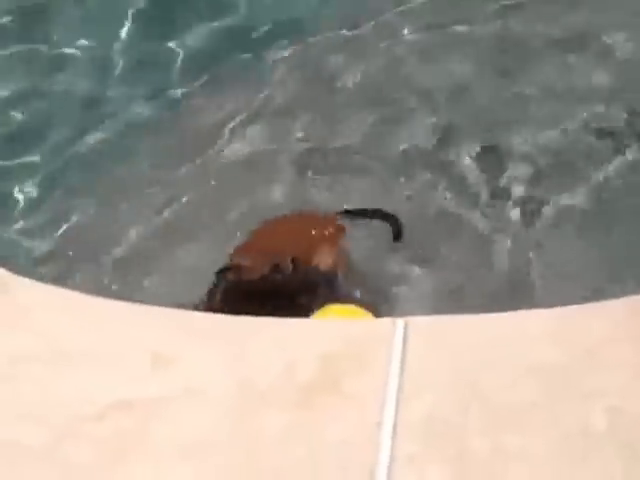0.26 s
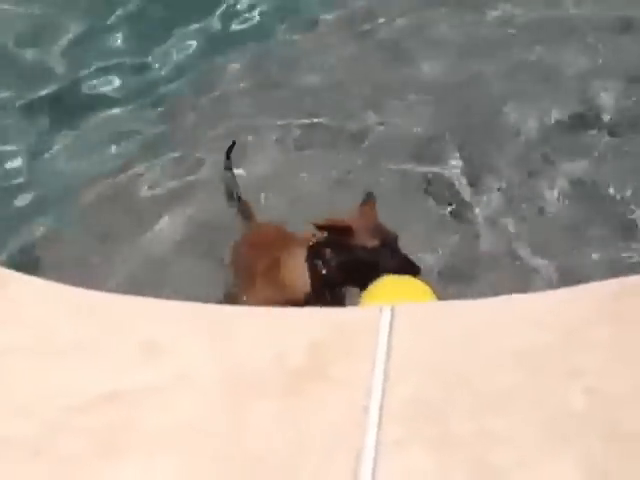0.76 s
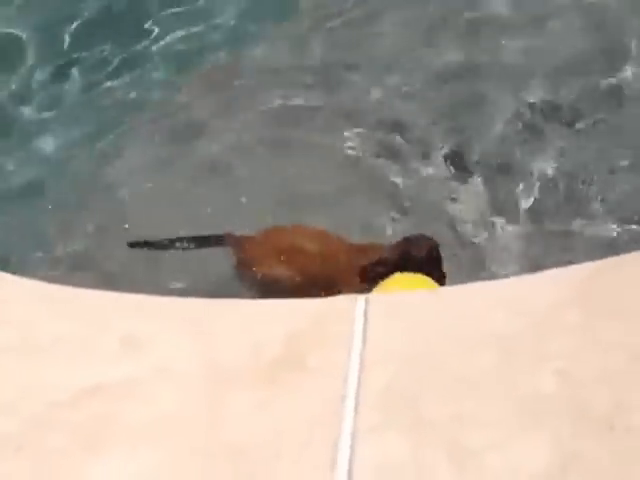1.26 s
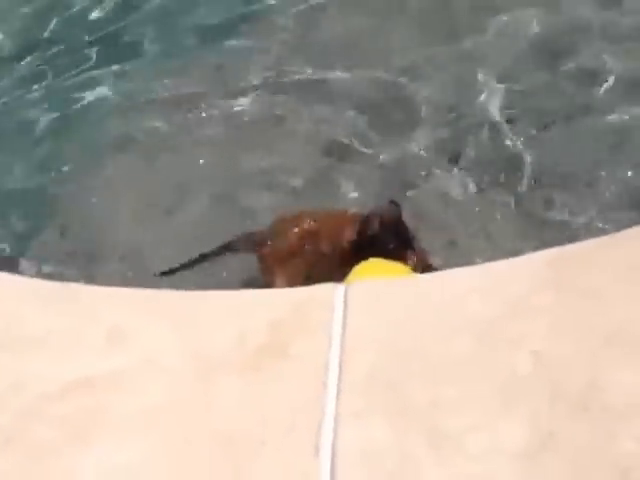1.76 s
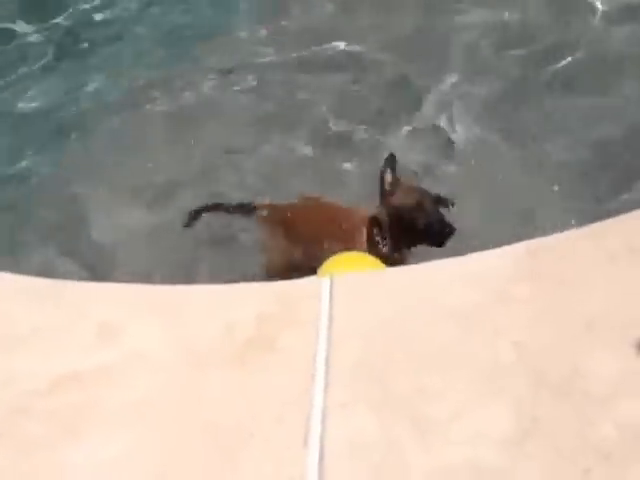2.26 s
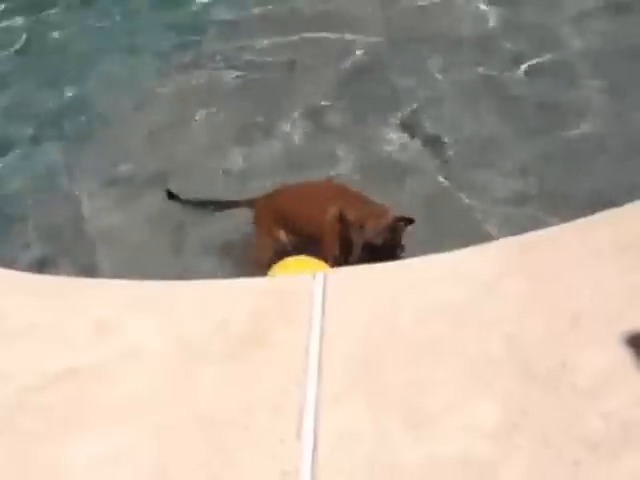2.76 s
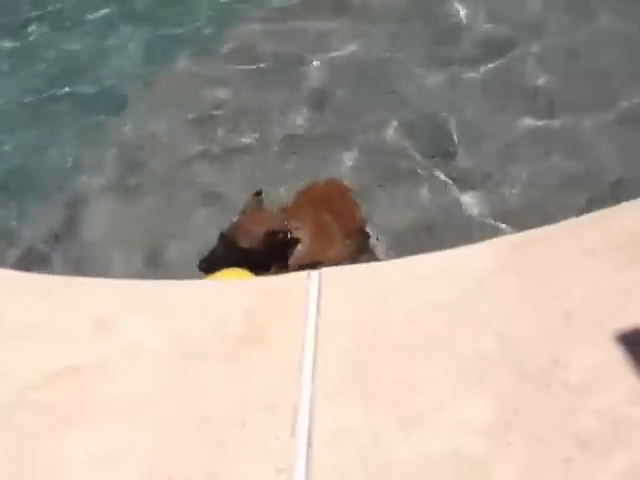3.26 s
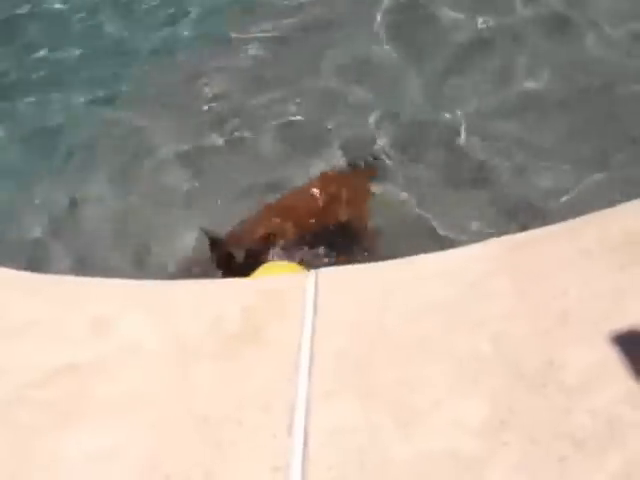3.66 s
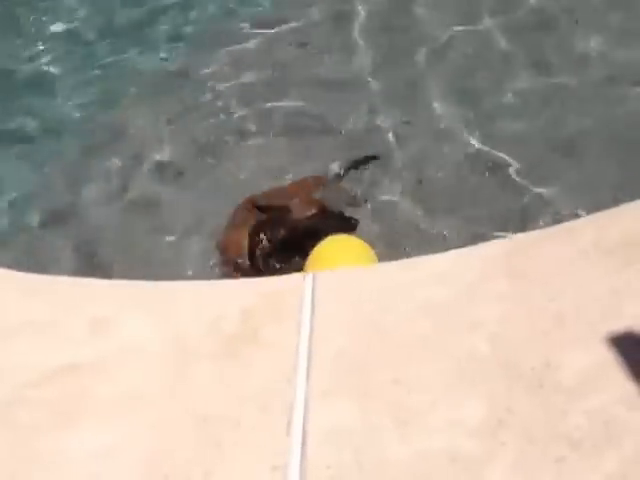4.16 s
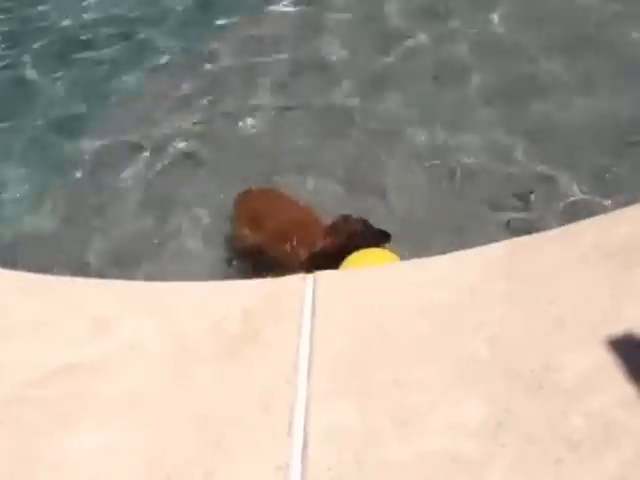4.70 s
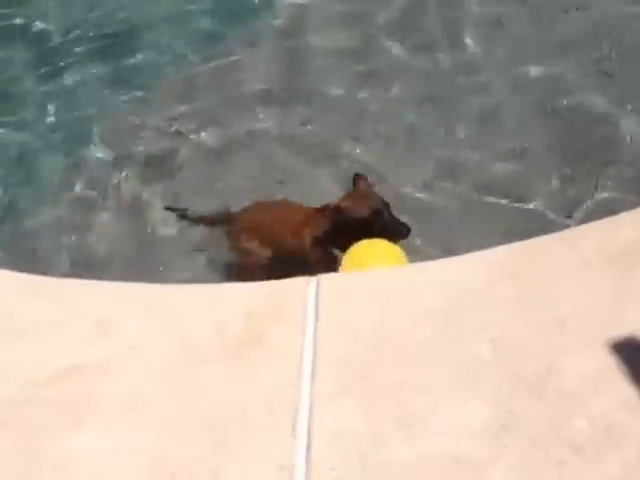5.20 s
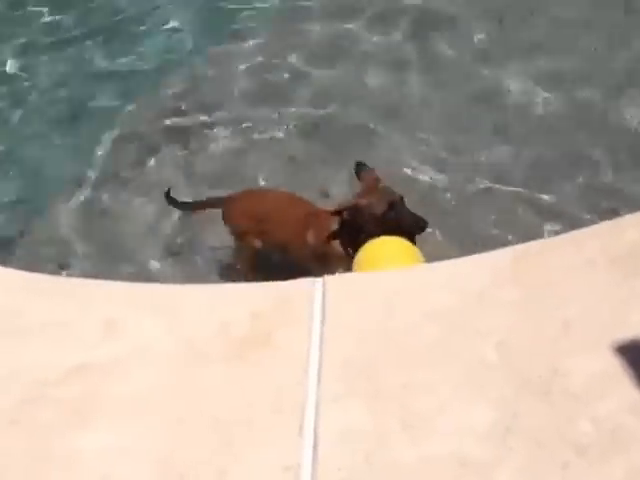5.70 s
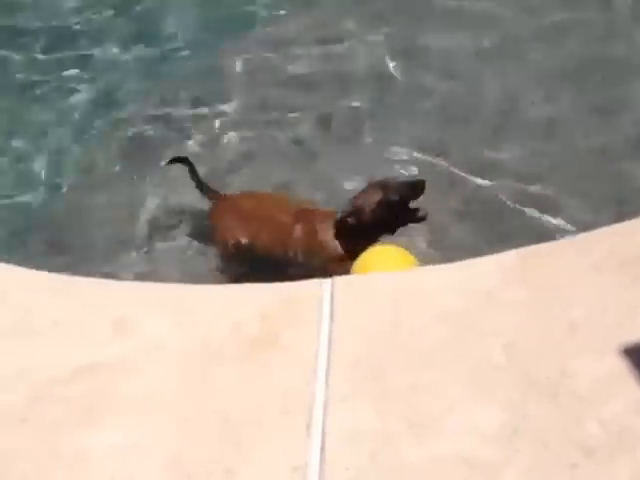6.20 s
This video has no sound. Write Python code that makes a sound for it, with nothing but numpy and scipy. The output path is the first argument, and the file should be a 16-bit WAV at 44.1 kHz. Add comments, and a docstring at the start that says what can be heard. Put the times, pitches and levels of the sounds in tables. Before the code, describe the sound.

A small puppy calls excitedly in a garden pool, very close to the microphone. A piercing scream comes first, then a hoarse bark and yelp amid plunging legs and drips; another scream follows, then barks and high yelps alternate to the end. Little grunts trail some calls. Water trickles from its coat, with a brief yard echo and a faint low outdoor wash. The loudest calls slightly overload the microphone.

```python
"""In a garden swimming pool a puppy barks, yelps and screams at close range over a low wash of air.
Voice: pulsing vocal folds and turbulent breath, shaped by throat and mouth resonances.
Small falling grunts and thin nasal whines are gliding tones with one overtone.
Water: rings and noise bursts for plunging legs, ticks for drops, gushes off the coat. One more such
ring is the thump of the microphone overloaded by a bark; its stage also rounds off the peaks.
The yard answers with early reflections and a diffuse tail."""
import sys
import numpy as np
from scipy import signal
from scipy.fft import rfft, irfft, next_fast_len
from scipy.io import wavfile
from scipy.ndimage import uniform_filter1d, map_coordinates

SR = 44100
rng = np.random.default_rng(int(sys.argv[2]) if len(sys.argv) > 2 else 0)


def int16_out(signal):
    """Quantize to a 16-bit WAV file."""
    q = np.round(np.clip(np.atleast_2d(signal).T, -1, 1) * 32767)
    wavfile.write(sys.argv[1], SR, q.astype(np.int16))


N = 284004  # length in samples

# Spectral shape of the garden wash: f/Hz, relative density/dB per Hz
AIR_SPECTRUM = [(18, -70.5), (30, -40.5), (90, -16.5), (170, -5.5), (280, -4.5), (328, -10), (355, -4),
                (540, -5.5), (1460, -18.5), (1590, -18.5), (2680, -23.5), (4420, -21.5), (5450, -33.5),
                (7270, -28), (16000, -46.5)]
# Mean level of the garden wash: t/s, level/dB
AIR_LEVEL_CURVE = [(0, -46.5), (.3, -49), (1.3, -46.5), (2.5, -53), (4.4, -47.5), (6.3, -51)]

# Gushes of water off the coat: peak t/s, build-up/s, relative level/dB
COAT_GUSHES = [(1.25, 0.45, -52), (1.499, 0.36, -49), (2.28, 0.59, -58.5), (3.15, 0.27, -57),
               (3.75, 0.23, -60.5), (5.0, 0.31, -53)]
# Colour of the trickling water: f/Hz, gain/dB
TRICKLE_COLOUR = [(300, -10), (900, -17), (2000, 12), (4500, 0.5), (7000, -1.5), (12000, -4.5),
                  (16000, -11.5)]
# The largest drops falling back: t/s, relative level/dB
FALLING_DROPS = [(0.601, -46), (0.655, -41), (0.848, -39.5), (1.054, -30), (1.5006, -38), (1.7651, -43.5),
                 (1.802, -40), (2.163, -37.5), (2.2528, -42), (2.3189, -41.5), (2.4088, -42), (3.4974, -43),
                 (3.9372, -44), (4.3136, -45)]
# Legs plunging in; the one at 4.414 s is the thump of the microphone overloaded by a bark:
# t/s, level/dB, initial ring f/Hz, noise level relative to the ring/dB
PLOPS_AND_THUMP = [(0.932, -29.5, 510, 1), (.957, -16, 243, -21), (.978, -27, 222, -11),
                   (0.993, -27, 518, -6.5), (1.021, -24, 330, -8.5), (1.116, -23.5, 380, -18),
                   (1.634, -23.5, 281, -24.5), (1.714, -24.5, 292, -31.5), (1.808, -29, 410, -11.5),
                   (1.831, -25.5, 265, -19.5), (1.846, -25.5, 430, -24), (3.277, -20, 230, -10),
                   (3.85, -23, 340, -3.5), (4.005, -35, 220, -18), (4.414, -13.5, 198.6, -11)]
DRAIN_S, DRIBBLE_DB = 0.047, -69.5  # time constant of draining; relative level of the steady dribble

# Screams: t/s, attack/s, time to the break/s, arch length/s, low f/Hz, top f/Hz, low-note level/dB,
# arch level/dB, low-note brightness/dB, arch brightness/dB, roughness/0-1
SCREAM_CALLS = [ (.295, 0.036, .035, .044, 1202, 1884, -2, -8.5, -4.5, -4.5, 0.24),
                (2.019, 0.013, .024, .043, 1215, 1943, -5, -9, 1.5, 1.5, 0.27), ]
SCREAM_ONSET_DB, SCREAM_RELEASE_DB, SCREAM_RELEASE_S = 27.5, 11.5, .004
SCREAM_OVERSHOOT, SCREAM_SETTLE_S = .13, .008  # the low note starts sharp by this share and settles
BREAK_HZ, LANDING_HZ, SCREAM_CREST = 1677, 1033, .42  # arch: first and last f, share of length at its top
BREAK_BRIGHT_DB, BREAK_ROUGH, BREAK_S = 5.5, 0.75, 0.0069  # the break is briefly shrill and torn
BREAK_GAP_DB = 7  # the voice briefly drops at the break
ARCH_CLEARING = 0.25  # share of the roughness shed after the break

# Grunts of the slackening folds: t/s, length/s, first f/Hz, last f/Hz, level/dB
FALLING_GRUNTS = [(.368, 0.054, 559, 337, -23), (1.248, 0.043, 525, 310, -25), (1.41, 0.03, 443, 380, -25),
                  (2.108, 0.027, 477, 386, -28.5), (2.895, 0.075, 414, 277, -33.5),
                  (3.795, 0.037, 359, 262, -31.5), (4.90, 0.04, 508, 400, -32),
                  (4.965, 0.039, 471, 288, -32.5), (5.575, 0.039, 487, 372, -27),
                  (6.338, 0.029, 475.6, 335, -28)]

# Barks: t/s, attack/s, time to the push/s, fade/s, first f/Hz, top f/Hz, opening level/dB, push level/dB,
# opening brightness/dB, settled brightness/dB, opening roughness/0-1, push roughness/0-1
BARK_CALLS = [ (1.152, 0.027, 0.05, .130, 422, 528, -17, -9, -4.5, -3.5, 0.1, 0.5),
              (2.754, 0.0034, .054, 0.046, 495, 551.7, -10, -5.5, 24.5, 1.5, .3, .1),
              (3.646, .005, 0.084, .080, 506.3, 544.4, -8, -14, 16, 2, .15, .25),
              (4.382, .004, .052, 0.029, 426.5, 489.3, -12.5, -5.5, 9.5, -11, 0.56, 0.6),
              (5.444, .003, .101, 0.021, 510.6, 605, -16, -4, -6.5, 0.5, 0.9, 0.44),
              (6.214, .003, 0.1, 0.012, 541.2, 565, -13.5, -4, -10.5, 3, 0.87, .25), ]
# Throat and mouth in a bark of average pitch: f/Hz, gain/dB
BARK_TRACT = [(150, -36), (330, -8), (500, -4.5), (750, -1), (1050, 4.5), (1300, 3.5), (1650, -5.5),
              (2100, -11.5), (2600, -8), (3250, -9), (3900, -20.5), (4800, -10.5), (5700, -20),
              (8000, -11.5)]
BARK_ONSET_DB, BARK_FADE_DB = 26, 25.5  # climbed during the attack, lost during the fade
BARK_CREST, BARK_SAG = .82, 0.2  # share of the push time at top pitch; share of top pitch lost by the end
JAW_SETTLE = 0.37  # share of the push time in which the brightness settles
FRAY = 0.46  # roughness gained as the bark fades
QUIVER_RATE = 80.6  # random knots per second in the unsteadiness of a bark
QUIVER_PITCH, QUIVER_DB, QUIVER_BRIGHT_DB = .012, 0.65, 2.5  # share of pitch, level, brightness

# Yelps: t/s, attack/s, rise/s, fall/s, first f/Hz, top f/Hz, last f/Hz, level/dB, brightness at the top/dB,
# roughness at the top/0-1
YELP_CALLS = [ (1.340, 0.044, .040, .030, 1004, 1225, 1008, -14.5, 3, 0.01),
              (3.044, 0.039, 0.065, 0.015, 969, 1253, 1055, -12.5, 3.5, .07),
              (3.213, 0.013, 0.054, .058, 1219, 1690, 1087, -11.5, 1, 0.04),
              (4.550, 0.063, 0.094, 0.025, 588.4, 1177, 980, -18.5, -4, 0.13),
              (4.754, 0.01, .054, .046, 1044, 1675, 781, -10, 2.5, 0), ]
# Throat and mouth in a yelp or scream: f/Hz, gain/dB
YELP_TRACT = [(300, -39.5), (700, -11.5), (1050, 5.5), (1280, 1.5), (1650, -5.5), (2000, -1), (2500, 8.5),
              (3300, 6.5), (3850, -8.5), (4800, 3), (5500, -19.5), (6500, -4.5), (8000, -3)]
YELP_ONSET_DB, YELP_RELEASE_DB, YELP_RELEASE_S = 23, 14, 0.027
YELP_STRAIN = 3.5  # roughness grows with this power of the pitch
YELP_OPENING_DB = 12  # brightness gained per octave of pitch

# Thin nasal whines: t/s, length/s, first f/Hz, last f/Hz, level/dB
NASAL_WHINES = [(1.968, 0.023, 5970, 6920, -30.5), (3.034, 0.021, 12600, 12100, -40.5),
                (3.195, 0.026, 14000, 13000, -42), (5.015, 0.014, 6500, 6400, -42)]

# Colour of air tearing past the folds: f/Hz, gain/dB
BREATH_COLOUR = [(300, -7), (800, -11), (1500, -7.5), (3000, 4), (5000, -4), (8500, -11), (11000, -19),
                 (16000, -26)]
FALL_POWER = 3.1  # every arch lingers at its top, then plunges
MOUTH_HZ, DETUNE_DB = 1512, 11  # above the mouth's resonance a high call weakens, dB per octave

# Decay of the yard's diffuse tail: f/Hz, t60/s
YARD_DECAY = [(150, 1), (500, 0.28), (1200, 0.57), (2500, 0.5), (5000, 0.52), (9000, 0.27), (15000, 0.2)]
# Colour of that tail: f/Hz, gain/dB
YARD_TAIL_COLOUR = [(200, -2.5), (600, -2), (1200, -2.5), (1800, 4), (2800, -10.5), (5000, -6),
                    (14000, 2.5)]
TOP_HZ = 15900  # band limit of the microphone; the folds' partials stop here too


def amp(db):
    """Level in decibels expressed as an amplitude ratio."""
    return 10 ** (np.asarray(db) / 20)


def unit(x):
    """Normalization to an rms of 1."""
    return x / np.sqrt(np.mean(x ** 2) + 1e-20)


def along(points, hz):
    """Interpolation of (f/Hz, value) points on a logarithmic frequency axis."""
    f, v = np.transpose(points)
    return np.interp(np.log(hz + 1), np.log(f + 1), v)


def curve(rows):
    """Linear interpolation of (t/s, value) points at every sample."""
    return np.interp(np.arange(N) / SR, *np.transpose(rows))


def wobble(rate, size):
    """Smooth random fluctuation: a spline through normal knots, rate of them per second."""
    knots = rng.standard_normal(int(size * rate / SR) + 4)
    return map_coordinates(knots, [np.arange(size) * rate / SR])


def filtered(x, response):
    """Linear filtering: the spectrum is multiplied by a function of frequency."""
    m = next_fast_len(len(x) + 4096)
    return irfft(rfft(x, m) * response(np.fft.rfftfreq(m, 1 / SR)), m)[:len(x)]


def coloured(x, points):
    """Minimum-phase filtering: folding the cepstrum makes a (f/Hz, gain/dB) shape causal."""
    def response(hz):
        cepstrum = irfft(np.log(amp(along(points, hz))))
        half = len(cepstrum) // 2
        return np.exp(rfft(np.r_[cepstrum[0], 2 * cepstrum[1:half], np.zeros(half)]))
    return filtered(x, response)


def add(track, s, sound):
    """Superposition of a sound on the track from time s."""
    part = track[max(0, round(s * SR)):][:len(sound)]
    part += sound[:len(part)]


def ramp(t, length):
    """Linear rise from 0 to 1 over the given length, then held."""
    return np.clip(t / length, 0, 1)


def air():
    """Broadband noise: the low wash of the garden, its level slightly restless."""
    wash = unit(coloured(rng.standard_normal(N), AIR_SPECTRUM))
    return wash * amp(curve(AIR_LEVEL_CURVE) + .7 * wobble(1.6, N))


def runoff():
    """Exponential draining: gushes build up linearly and decay, over a steady dribble."""
    t = np.arange(N) / SR
    strength = amp(DRIBBLE_DB)
    for s, build, db in COAT_GUSHES:
        draining = np.exp(-np.maximum(t - s, 0) / DRAIN_S)
        strength = strength + amp(db) * ramp(t - s + build, build) * draining
    return strength


def trickle():
    """Superposed impacts: many tiny ones of very unequal size blend with a continuous hiss."""
    patter = (rng.random(N) < 2500 / SR) * rng.standard_normal(N) * amp(2.2 * wobble(49, N))
    flow = unit(unit(patter) + 0.97 * rng.standard_normal(N))
    return coloured(flow * amp(6.5) * runoff(), TRICKLE_COLOUR)


def drops():
    """Impact noise: each drop ticks on the surface as a rapidly decaying burst."""
    t = np.arange(SR // 8) / SR
    ticks = np.zeros(N)
    for s, db in FALLING_DROPS:
        add(ticks, s, amp(db + 9.0 - 60 * t / 0.025) * rng.standard_normal(len(t)))
    return coloured(ticks, [(500, -21), (3000, -7.5), (7000, -6.0), (12000, -9), (16000, -18.5)])


def plops_and_thump():
    """Damped resonance: collapsing cavities ring upward amid spray; the overload thump has the same form."""
    rings, bursts = np.zeros(N), np.zeros(N)
    t = np.arange(SR // 8) / SR
    swell = 1 - np.exp(-t / .003)
    for s, db, hz, noise_db in PLOPS_AND_THUMP:
        ring = np.sin(2 * np.pi * hz * t * (1 + 3 * t)) * amp(-60 * t / 0.038) * swell
        add(rings, s, amp(db) * ring)
        envelope = amp(db + noise_db - 60 * t / 0.063) * swell
        add(bursts, s, envelope * rng.standard_normal(len(t)))
    slaps = coloured(bursts, [(100, -14.0), (500, 19.5), (2000, 8), (3500, -1.5), (15000, -15.0)])
    return rings + slaps


def resonance(x, hz, width_hz):
    """Resonant filtering by heterodyne: a one-pole filter follows a moving centre frequency."""
    turn = np.exp(2j * np.pi * np.cumsum(hz) / SR)
    pole = np.exp(-np.pi * width_hz / SR)
    return 2 * np.real(turn * signal.lfilter([1 - pole], [1, -pole], x / turn))


def breath(phase):
    """Turbulence: puffs of noise follow the fold cycle, and the air jet half whistles."""
    size = len(phase)
    puffs = (1 + .4 * np.cos(phase)) * amp(2.5 * wobble(350, size))
    turbulence = unit(coloured(rng.standard_normal(size) * puffs, BREATH_COLOUR))
    jet_hz = 7500 * np.exp(.18 * wobble(70, size))  # a restless pitch
    return unit(turbulence + 2 * resonance(turbulence, jet_hz, width_hz=350))


def folds(pitch, rough, corner_hz, wander, rasp, slope_db, odd=1):
    """Quasi-periodic vibration: fold pulses as harmonic sums with irregular cycles, plus breath."""
    size = len(pitch)
    drift = 1 + wander * (rough + 0.53) * wobble(208.7, size)
    phase = 2 * np.pi * np.cumsum(pitch * drift) / SR
    # early or late closures tear the upper partials and spare the lowest
    phase = phase + .36 * np.sqrt(rough) * wobble(620, size)
    k = np.arange(1, 21)[:, None]  # harmonic number
    weights = amp(slope_db * np.log2(k)) / (1 + (k * pitch / corner_hz) ** 2)
    weights = weights * np.where(k % 2, odd, 1)
    pulses = -unit(np.sum((k * pitch < TOP_HZ) * weights * np.cos(k * phase), axis=0))
    return pulses * (1 - .8 * rough) + rasp * (rough + .1) * breath(phase)


def mouth(voice, t, db, bright_db):
    """Radiation: a wide mouth favours the middle resonances; effort sets the level."""
    bright_hz, upper_hz = 1750, 6300  # lower and upper limits of the middle band
    edge, top_rise = 0.0011, .012  # end fades and build-up of the top, s

    def middle_band(hz):
        return (1 - 1 / (1 + (hz / bright_hz) ** 8)) / (1 + (hz / upper_hz) ** 8)

    middle = filtered(voice, middle_band)
    top = filtered(voice, lambda hz: 1 - 1 / (1 + (hz / upper_hz) ** 8))
    # closing muffles the very top too, but opening adds less there; the top builds up last
    top_gain = amp(np.minimum(bright_db, 0.69 * bright_db)) * (1 - np.exp(-t / top_rise))
    voice = voice + (amp(bright_db) - 1) * middle + (top_gain - 1) * top
    # a running rms evens out the voice before the level contour is imposed
    voice = voice / np.sqrt(np.abs(uniform_filter1d(voice ** 2, size=400)) + 1e-12)
    return voice * np.clip(np.minimum(t, t[-1] - t) / edge, 0, 1) * amp(db)


def arch(t, rise, fall, first_hz, top_hz, last_hz):
    """Pitch contour of varying fold tension: a smooth climb, then an ever steeper drop."""
    climb = np.sin(np.pi / 2 * ramp(t, rise)) ** 2
    drop = ramp(t - rise, fall) ** FALL_POWER
    return first_hz + (top_hz - first_hz) * climb + (last_hz - top_hz) * drop


def detuned(pitch):
    """Resonance mismatch: level lost by a pitch above the mouth's resonance, dB."""
    return DETUNE_DB * np.maximum(np.log2(pitch / MOUTH_HZ), 0)


def high_register(t, pitch, db, bright_db, rough):
    """Clear fold vibration for yelps and screams, with sidebands by amplitude modulation."""
    # the folds snap shut harder in a louder call
    corner_hz = 9000 * amp(0.39 * (db + 11))
    # strain makes the overtones stronger, dB per octave
    slope_db = -8 + 11 * np.minimum(rough, .45)
    source = folds(pitch, rough, corner_hz=corner_hz, wander=0.017, rasp=0.75, slope_db=slope_db)
    # a slower vibration of the folds beats against a rough call
    beat_hz = 615 * (1 + 0.054 * wobble(300, len(t)))
    slow = np.cos(2 * np.pi * np.cumsum(beat_hz) / SR)
    voice = coloured(source * (1 + .9 * rough * slow), YELP_TRACT)
    # at the very highest pitches the stretched mouth rings with a shrill upper resonance
    shrill_hz = np.full(len(t), 5350)
    stretched = uniform_filter1d(1. * (pitch > 1720), size=600)
    ringing = resonance(resonance(voice, shrill_hz, width_hz=1600), shrill_hz, width_hz=1600)
    voice = voice + 4.7 * stretched * ringing
    return mouth(voice, t, db + 3 * rough * wobble(200, len(t)), bright_db)


def scream(attack, hold, length, low_hz, top_hz, low_db, arch_db, low_bright_db, arch_bright_db, rough):
    """Register break: a low note swells until the voice jumps into a higher arch."""
    t = np.arange(0, hold + length, 1 / SR)
    since = np.maximum(t - hold, 0)
    broken = ramp(t - hold + .002, .004)
    jolt = broken * np.exp(-since / BREAK_S)
    low = low_hz * (1 + SCREAM_OVERSHOOT * np.exp(-t / SCREAM_SETTLE_S))
    crest = SCREAM_CREST * length
    high = arch(since, crest, (1 - SCREAM_CREST) * length, BREAK_HZ, top_hz, LANDING_HZ)
    pitch = low + broken * (high - low)
    db = low_db + broken * (arch_db - low_db - detuned(high)) - BREAK_GAP_DB * jolt
    db = db - SCREAM_ONSET_DB * (1 - ramp(t, attack)) ** 1.97
    db = db - SCREAM_RELEASE_DB * (1 - ramp(t[-1] - t, SCREAM_RELEASE_S))
    bright = low_bright_db + broken * (arch_bright_db - low_bright_db) + BREAK_BRIGHT_DB * jolt
    rough = rough * (1 - ARCH_CLEARING * broken) + BREAK_ROUGH * jolt
    return high_register(t, pitch, db, bright, np.clip(rough, 0, 1))


def glides(table, jitter, overtone_db):
    """Frequency gliding: soft closed-mouth tones, grunts or whines, swell and slide in pitch."""
    out = np.zeros(N)
    for s, length, first_hz, last_hz, db in table:
        size = int(length * SR)
        pitch = np.linspace(first_hz, last_hz, size) * (1 + jitter * wobble(350, size))
        phase = 2 * np.pi * np.cumsum(pitch) / SR
        tone = unit(np.sin(phase) + amp(overtone_db) * np.sin(2 * phase))
        add(out, s, amp(db) * tone * np.sin(np.linspace(0, np.pi, size)))
    return out


def low_register(t, pitch, db, bright_db, rough):
    """Hoarse fold vibration for barks, through resonances that move with larynx and jaw."""
    # pushed hard, the folds lock an octave up and the odd partials fade
    odd = np.clip((-4 - db) / 5, .15, 1)
    source = folds(pitch, rough, corner_hz=6400, wander=0.033, rasp=.7, slope_db=-1.0, odd=odd)
    # the larynx drops for a deeper bark and takes the resonances down with it
    stretch = (np.mean(pitch) / 545) ** 0.87
    voice = coloured(source, [(hz * stretch, level) for hz, level in BARK_TRACT])
    # the upper resonance sinks as the jaw settles
    open_hz, settled_hz, settle_s = 2900, 2450, 0.015
    upper_hz = settled_hz + (open_hz - settled_hz) * np.exp(-t / settle_s)
    upper_hz = upper_hz * np.exp(0.034 * wobble(QUIVER_RATE, len(t)))
    voice = voice + 1.6 * resonance(voice, upper_hz, width_hz=370)
    return mouth(voice, t, db + 2 * rough * wobble(220, len(t)), bright_db)


def bark(attack, push, fade, first_hz, top_hz, open_db, push_db, open_bright_db, bright_db,
         open_rough, push_rough):
    """Rising effort: the voice builds to a push while the jaw settles, then fades and frays."""
    t = np.arange(0, push + fade, 1 / SR)
    effort, fading = ramp(t, push), ramp(t - push, fade)
    crest = BARK_CREST * push
    pitch = arch(t, crest, t[-1] - crest, first_hz, top_hz, top_hz * (1 - BARK_SAG))
    db = open_db + (push_db - open_db) * effort
    db = db - BARK_ONSET_DB * (1 - ramp(t, attack)) - BARK_FADE_DB * fading
    unsettled = np.exp(-(t / (JAW_SETTLE * push)) ** 1.7)
    bright = bright_db + (open_bright_db - bright_db) * unsettled
    rough = open_rough + (push_rough - open_rough) * effort + FRAY * fading
    pitch = pitch * (1 + QUIVER_PITCH * wobble(QUIVER_RATE, len(t)))
    db = db + QUIVER_DB * wobble(QUIVER_RATE, len(t))
    bright = bright + QUIVER_BRIGHT_DB * wobble(QUIVER_RATE, len(t))
    return low_register(t, pitch, db, bright, np.clip(rough, 0, 1))


def yelp(attack, rise, fall, first_hz, top_hz, last_hz, db, bright_db, rough):
    """Fold tension: under one arch of pitch, higher means brighter and more strained."""
    t = np.arange(0, rise + fall, 1 / SR)
    pitch = arch(t, rise, fall, first_hz, top_hz, last_hz)
    level = db - detuned(pitch) - YELP_ONSET_DB * (1 - ramp(t, attack))
    level = level - YELP_RELEASE_DB * (1 - ramp(t[-1] - t, YELP_RELEASE_S))
    height = pitch / top_hz
    bright = bright_db + YELP_OPENING_DB * np.log2(height)
    return high_register(t, pitch, level, bright, np.clip(rough * height ** YELP_STRAIN, 0, 1))


def puppy():
    """Source and filter: screams and yelps use the high register, barks the low one."""
    out = np.zeros(N)
    for table, call in [(SCREAM_CALLS, scream), (BARK_CALLS, bark), (YELP_CALLS, yelp)]:
        for s, *settings in table:
            add(out, s, call(*settings))
    grunts = glides(FALLING_GRUNTS, jitter=0.18, overtone_db=-16.5)
    whines = glides(NASAL_WHINES, jitter=0.0074, overtone_db=-37)
    return out + grunts + whines


def yard(x):
    """Reverberation: pool edge and deck reflect early; walls and fences add a diffuse tail."""
    delay, early_db, tail_db = 0.015, -17.5, -9.5  # build-up of the tail in s; levels
    hz, t, z = signal.stft(rng.standard_normal(SR * 3 // 4), SR, nperseg=256)
    decay_db = -60 * t / along(YARD_DECAY, hz)[:, None]
    shape = amp(along(YARD_TAIL_COLOUR, hz)[:, None] + decay_db)
    tail = signal.istft(z * shape, SR, nperseg=256)[1]
    age = np.arange(len(tail)) / SR
    tail = tail * (1 - np.exp(-(age / delay) ** 2))
    early = rng.standard_normal(len(tail)) * amp(-60 * age / 0.062) * (age > .002)
    response = amp(tail_db) * tail / np.linalg.norm(tail)
    response = response + amp(early_db) * early / np.linalg.norm(early)
    return signal.fftconvolve(x, response)[:N]


def scene():
    """Superposition of voice, water and thump, their echo from the yard, and the air."""
    near = puppy() + trickle() + drops() + plops_and_thump()
    return (near + yard(near) + air())[None]


def record(dry, low_hz=70):
    """Saturation and band limits: the microphone rounds off peaks, loses deep bass and the very top."""
    x = dry[0] / (1 + np.abs(dry[0]) ** 7) ** (1 / 7)
    return filtered(x, lambda hz: (hz < TOP_HZ) * hz / np.hypot(hz, low_hz))[None]


dry = scene()
out = record(dry)
int16_out(out)
```